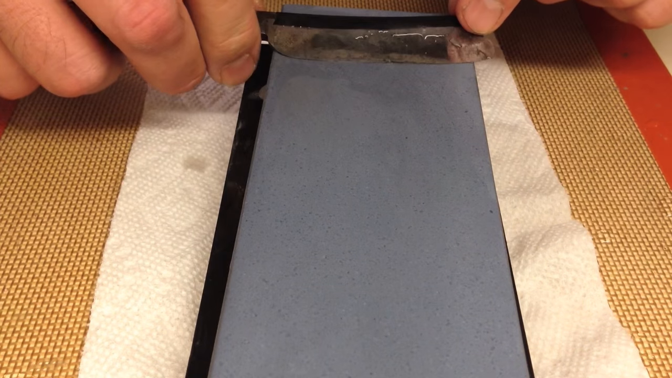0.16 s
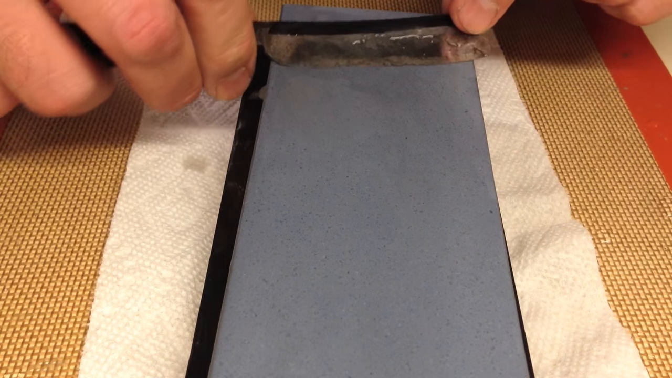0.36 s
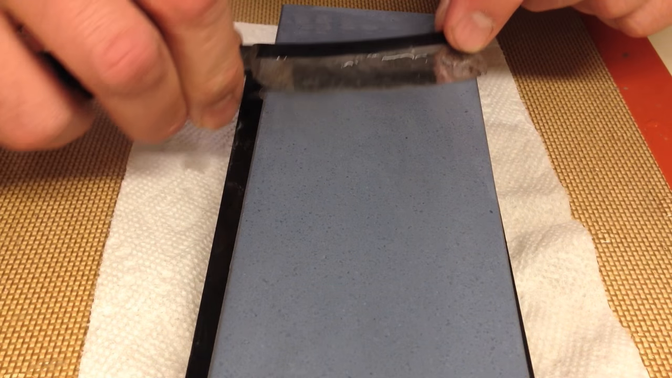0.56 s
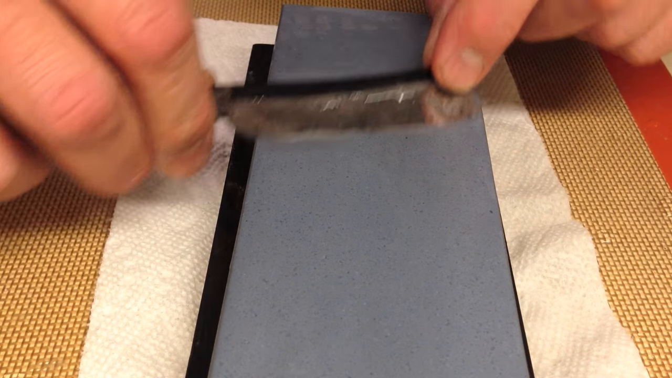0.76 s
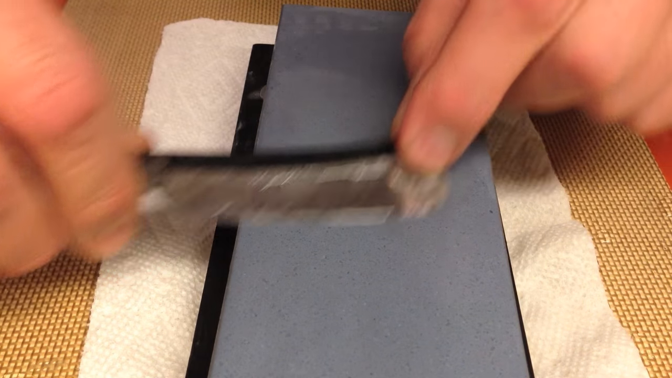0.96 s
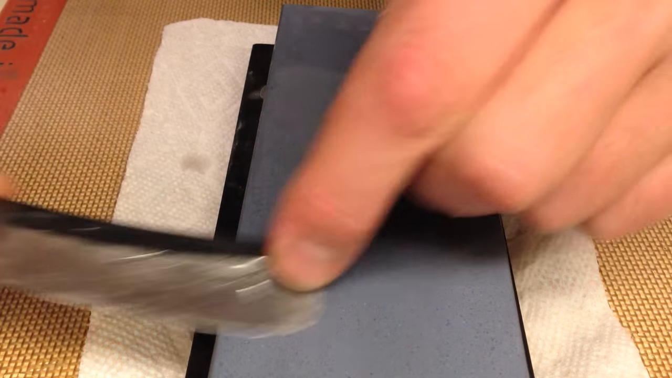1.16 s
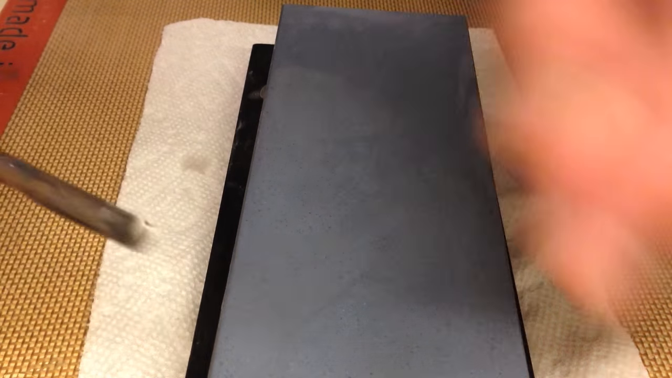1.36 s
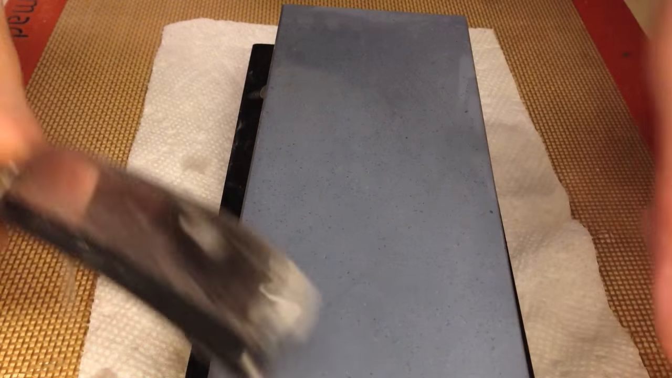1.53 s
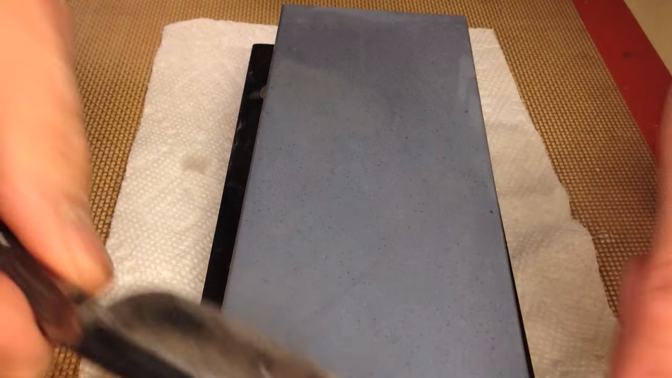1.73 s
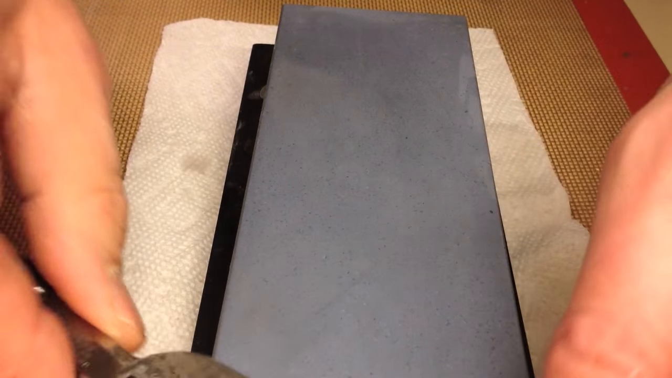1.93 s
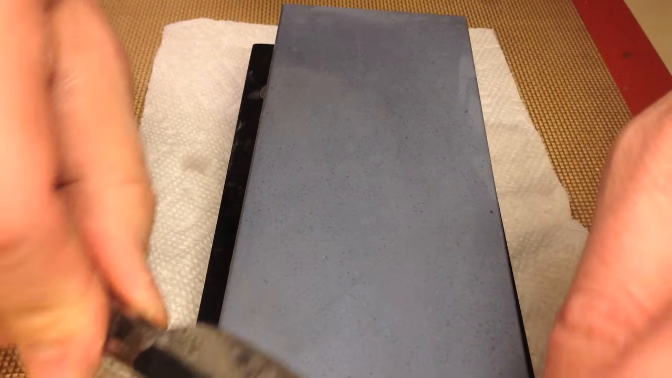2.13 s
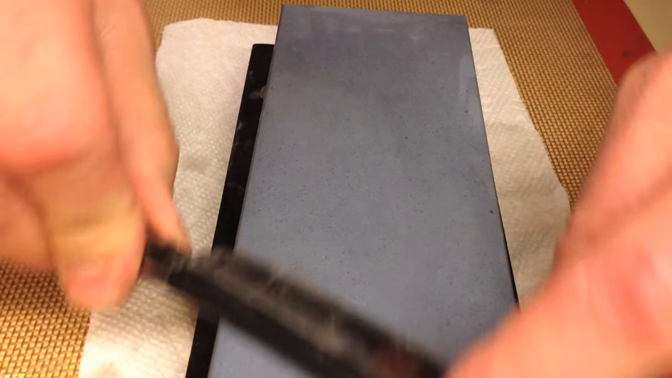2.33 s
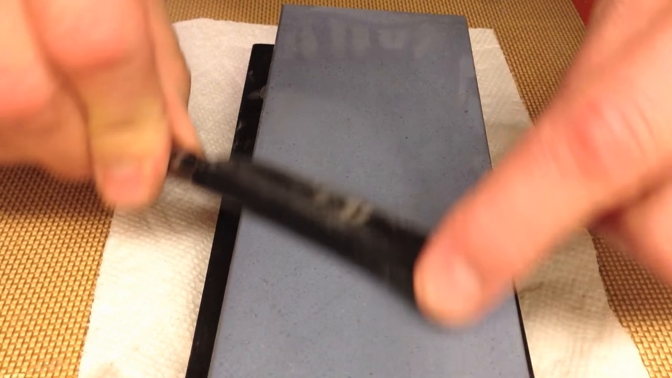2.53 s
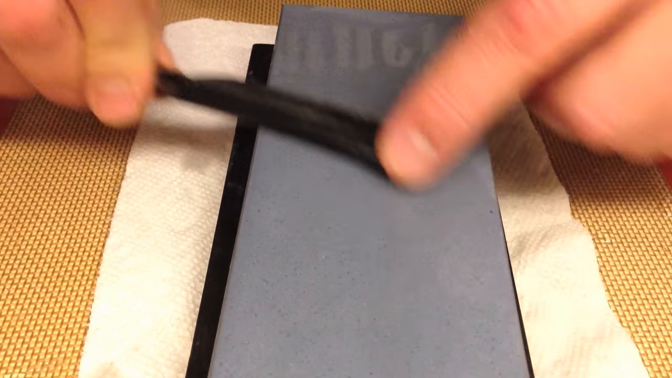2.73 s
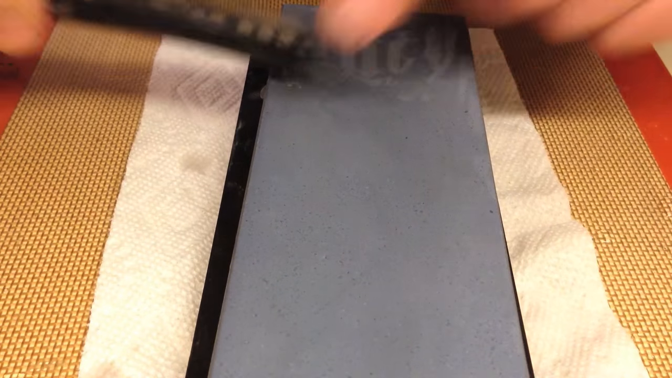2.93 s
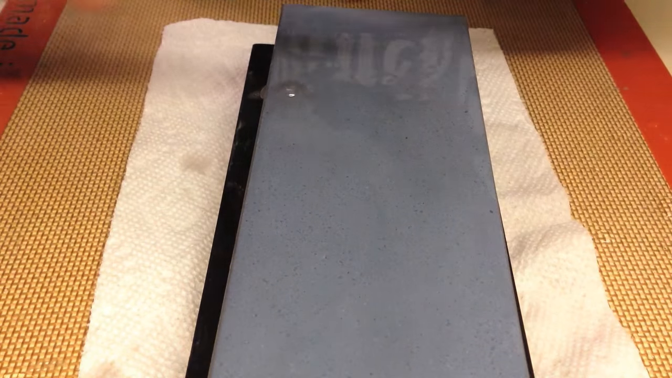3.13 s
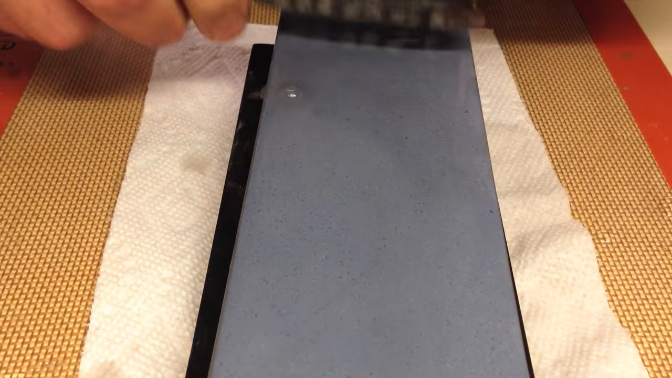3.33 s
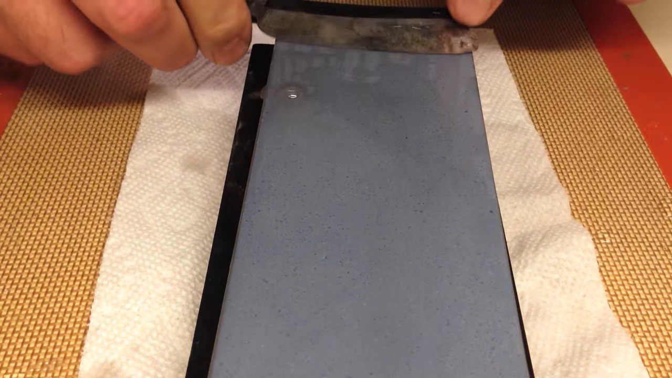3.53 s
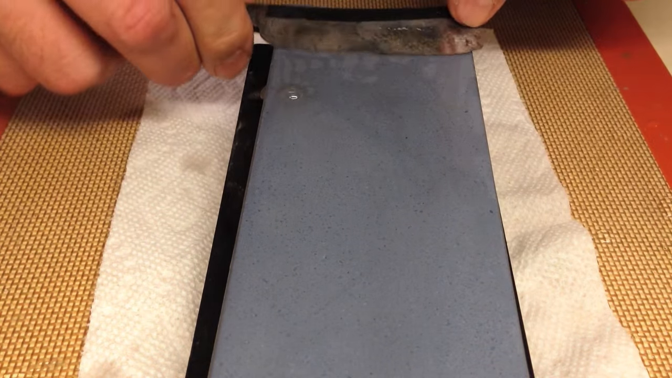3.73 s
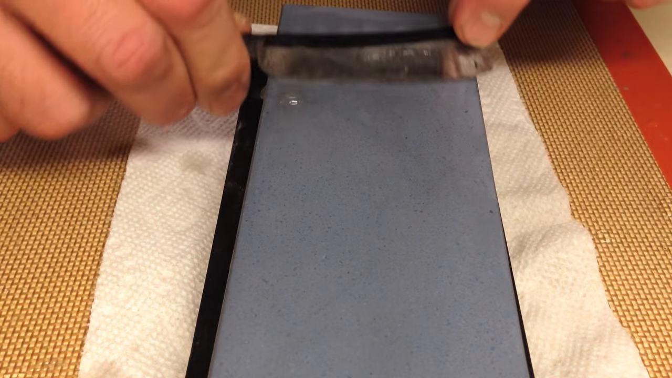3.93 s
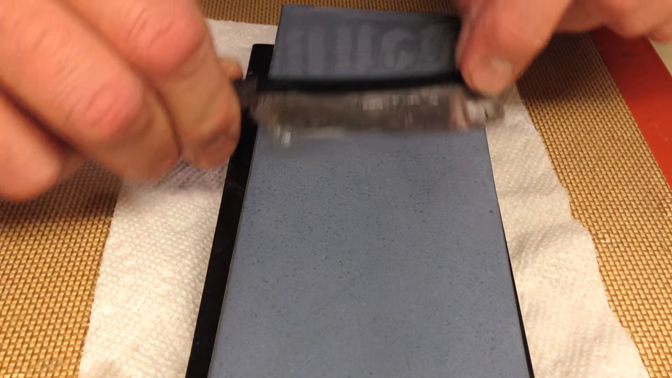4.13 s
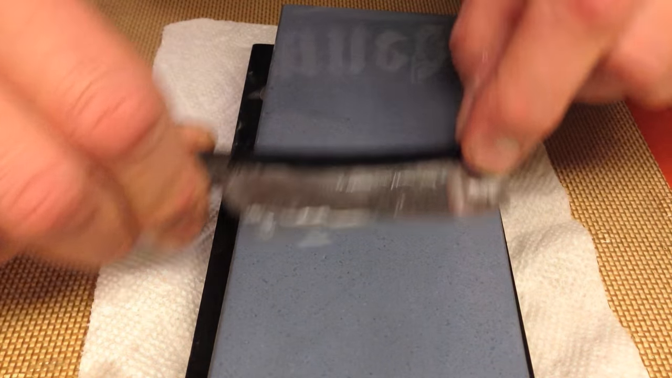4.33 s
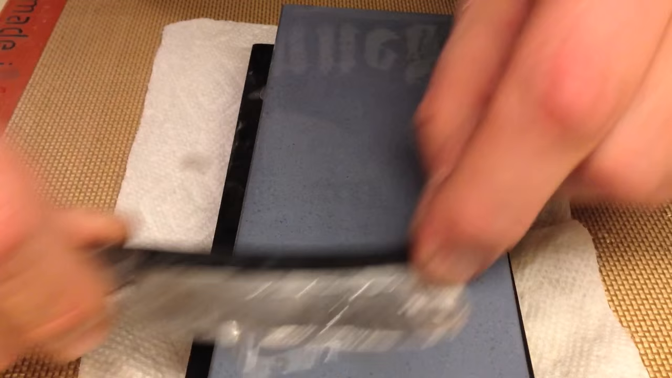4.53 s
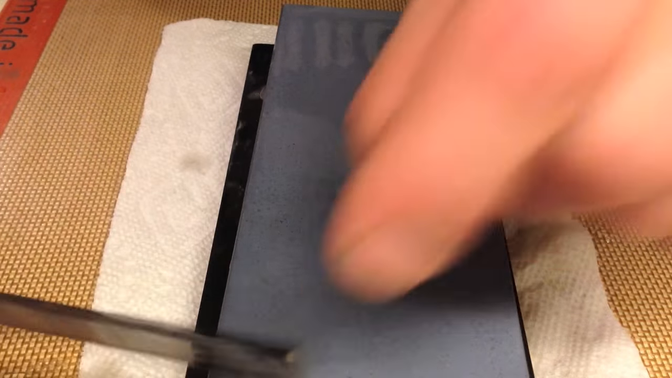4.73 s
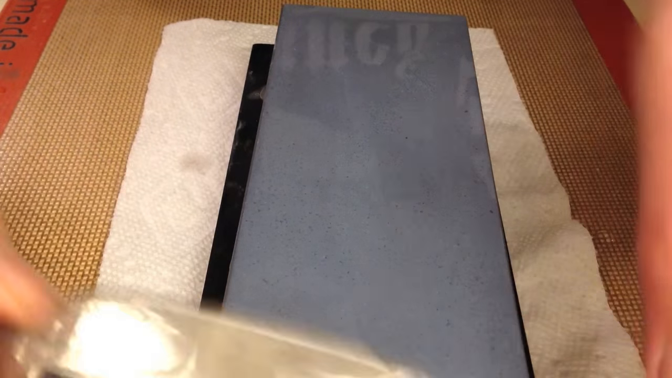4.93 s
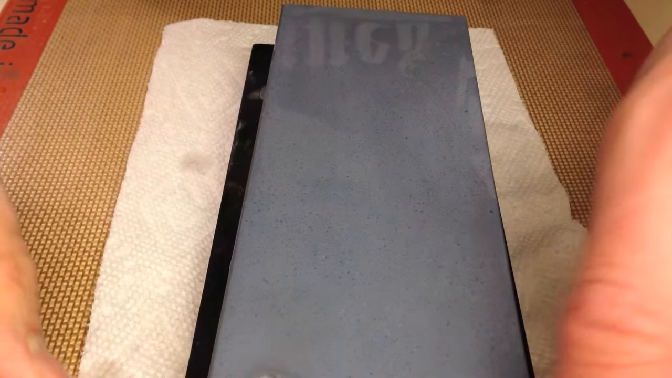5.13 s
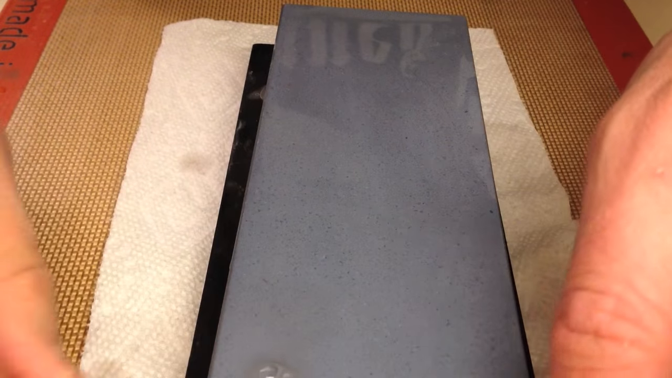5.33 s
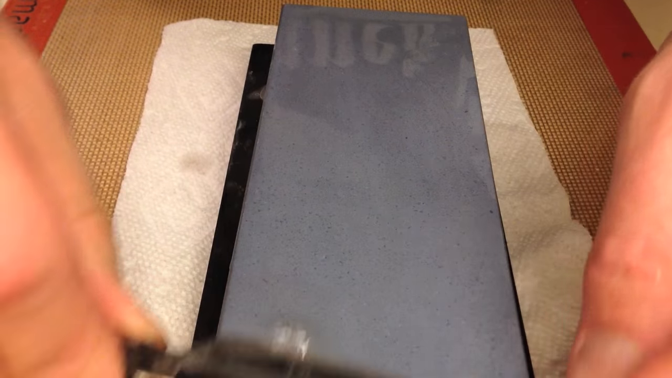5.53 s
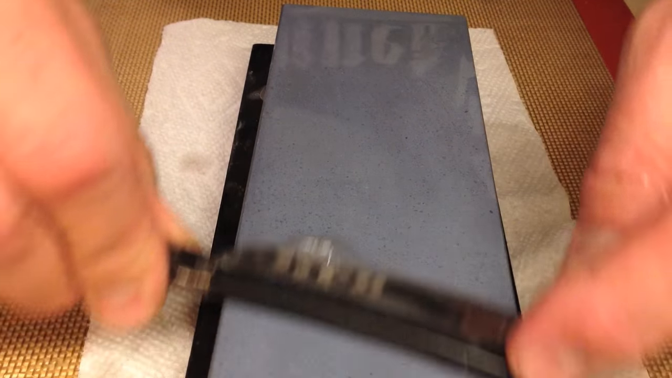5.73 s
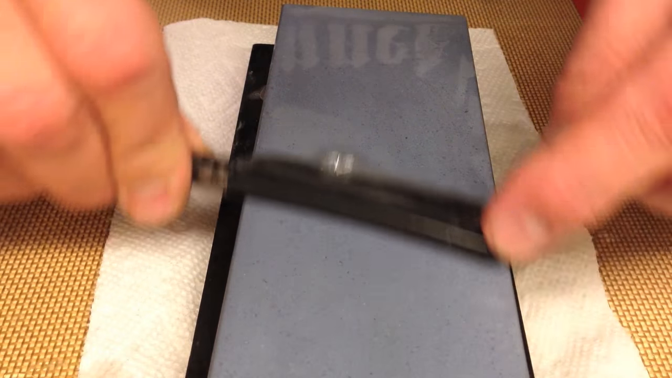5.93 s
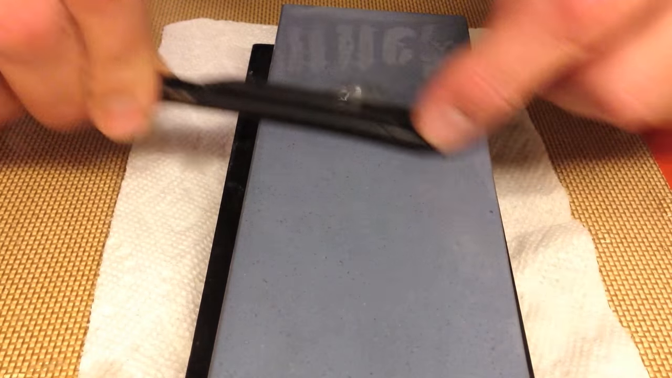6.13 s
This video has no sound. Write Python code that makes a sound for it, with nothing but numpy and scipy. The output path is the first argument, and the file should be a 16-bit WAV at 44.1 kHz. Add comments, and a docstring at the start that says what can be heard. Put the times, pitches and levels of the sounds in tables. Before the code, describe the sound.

Four gritty honing strokes of a razor on a wet stone, hard clicks at each turn, in a quiet small room with faint hum.

```python
"""A straight razor is honed on a wet waterstone on a table in a small room, over a low motor hum and room noise.
A faint touch leads to the first push; the spine clicks down and the edge rolls on to the stone for the return.
A tiny wet plink, soft contacts and the second push follow, then another click and roll and the second return.
Strokes and rubs are grit noise through resonances; touches are filtered clicks that ring blade and table."""
import sys
import numpy as np
from scipy import signal
from scipy.fft import rfft, irfft, next_fast_len
from scipy.io import wavfile
from scipy.ndimage import uniform_filter1d, map_coordinates

SR = 44100
rng = np.random.default_rng(int(sys.argv[2]) if len(sys.argv) > 2 else 0)


def wav_out(sig):
    """Save sig, one row per channel (or a flat mono array), as 16-bit PCM at SR to the path in sys.argv[1]."""
    wavfile.write(sys.argv[1], SR, np.round(np.clip(np.atleast_2d(sig).T, -1, 1) * 32767).astype(np.int16))


N = 272097

SPLIT_HZ, CUTOFF_HZ = 6800, 15500
ROOM_NOISE_DB = -48

# Plain rasp of steel on grit. Each row: frequency in Hz, relative density in dB per Hz.
RASP_SPECTRUM_HZ_DB = [(600, -29), (1200, -11), (1550, -13.5), (2200, -8), (3200, 3), (4300, 3), (6000, 4),
                       (7500, 1.5), (9500, 3), (11500, -0.5), (13800, -3), (15500, -8.5)]
# Four strokes, push and return in turn. Each row: time in seconds, level in dB before the trim of the rasp
# below the split, and of the hiss above it.
STROKE_LEVELS_S_DB = [
    [(0.36, -84, -84), (0.44, -51.5, -71.5), (0.726, -47, -50.5), (0.922, -61.5, -50.5),
     (0.946, -53.5, -45.5), (1.022, -62, -54), (1.042, -54, -56.5), (1.168, -68.5, -64),
     (1.27, -58.5, -66.5), (1.3, -91, -79)],
    [(2.1, -64, -72), (2.13, -66, -80), (2.16, -51.5, -63.5), (2.246, -47.5, -58), (2.334, -49.5, -49),
     (2.516, -59.5, -58.5), (2.58, -56, -47), (2.78, -69, -64), (2.948, -71, -71), (3.0, -79, -82)],
    [(3.7, -65, -85), (3.958, -49, -63.5), (4.234, -47.5, -61.5), (4.352, -48, -55), (4.47, -55, -66),
     (4.494, -56, -51), (4.614, -44.5, -48), (4.65, -54.5, -58), (4.718, -57, -58.5), (4.78, -73, -75)],
    [(5.395, -61, -89), (5.417, -48, -74), (5.451, -43.5, -57), (5.591, -52, -59.5), (5.675, -50.5, -63.5),
     (5.783, -58, -71), (5.841, -54, -63), (5.871, -54.5, -64.5), (6.107, -60.5, -60), (6.17, -61, -59)],
]
# Main blade resonance, one curve a stroke. Each row: time in seconds, centre in Hz.
STROKE_PITCH_S_HZ = [
    [(.45, 5860), (.72, 5370), (.82, 5830), (.91, 5550), (.945, 4400), (1.05, 3050)],
    [(2.16, 6040), (2.3, 5800), (2.5, 5600), (2.95, 5760)],
    [(4.02, 5530), (4.24, 5220), (4.32, 4700), (4.43, 4540), (4.54, 3620), (4.61, 4440), (4.66, 3230),
     (4.72, 2520)],
    [(5.41, 5970), (5.6, 5640), (5.77, 5030), (5.84, 6160), (5.97, 6700), (6.15, 6170)],
]
# Main resonance against travel. Each row: lag (travel is elapsed share to this power), width in Hz,
# lift over the plain rasp in dB, travel (0-1) where strongest, travel until 6 dB down.
STROKE_SHAPES = [(.85, 600, 21.5, 0.45, 0.32), (1, 950, 14.5, 0.14, 0.1), (1, 467, 18, 0.64, 0.3),
                 (1, 720, 12, 0.28, 0.3)]
# Lesser resonances of a push. Each row: start in Hz, end in Hz, width in Hz, lift in dB,
# travel (0-1) where strongest, travel until 6 dB down (sign has no effect).
PUSH_RESONANCES = [(1890, 1480, 320, 21.5, 0.2, 0.4), (2650, 2180, 290, 31.5, 0.21, 0.21),
                   (10200, 8000, 770, 9, 0.7, 0.3), (14000, 12700, 3400, 14, 0.21, -0.3)]
# Lesser resonances of a return. Columns as for the push: Hz, Hz, Hz, dB, travel, travel.
RETURN_RESONANCES = [(1805, 1280, 430, 23.5, .12, 0.25), (2560, 2380, 230, 13, 0.38, 0.37),
                     (9220, 5700, 1040, 10.8, 0.33, 0.1), (11200, 9400, 1900, 8.5, .58, 0.23)]
# Edge biting or brushing the wet stone. Each row: middle in seconds, half length in seconds, centre in Hz,
# width in Hz, level in dB before the swell.
RUBS = [(.18, 0.32, 2310, 196, -71.5), (0.244, 0.21, 1220, 150, -72), (0.288, 0.2, 4130, 900, -72.5),
        (0.948, 0.025, 4400, 400, -56), (1.06, 0.056, 3120, 347, -54), (1.18, 0.18, 3290, 300, -66.5),
        (1.262, 0.017, 8300, 700, -63), (1.492, 0.14, 2200, 250, -75), (1.558, 0.073, 6000, 7000, -67.5),
        (2.604, 0.1, 7240, 895, -51.5), (2.9, 0.11, 7850, 400, -70), (2.933, 0.05, 5800, 400, -69.5),
        (3.231, 0.1, 6380, 500, -80), (4.222, 0.083, 2394, 246, -49.5), (4.504, 0.022, 8450, 2000, -48),
        (4.721, .04, 2510, 199, -55), (5.668, 0.11, 2240, 454, -57), (5.838, .04, 6040, 600, -47),
        (6.123, 0.15, 3430, 550, -60.5)]
# Steel touching stone, rebounds included. Each row: time in seconds, crack in dB, ring in dB, thump in dB,
# lowest crack in Hz, top of the soft contact in Hz, sharp share of the contact in dB.
TOUCHES = [(0.12, -22, -43, -34, 706, 2790, -40), (1.9014, 10, -8.5, -10, 1800, 7020, -52),
           (2.0323, 6.5, -46, -24, 686, 3230, -18.5), (3.5287, -9.5, -35, -32, 1010, 3720, -33),
           (3.53, -16, -27.5, -23, 900, 3200, -45), (3.608, -4.5, -33, -32, 1100, 3060, -33),
           (5.152, 6, -12, -9, 1260, 6040, -51), (5.1539, 0.5, -16.5, -43.5, 1300, 2970, -50),
           (5.2948, 1, -40, -22, 600, 2150, -28), (5.327, -21.5, -50, -26, 600, 2100, -11)]
# Blade against stone. Each row: frequency in Hz, level in dB, t60 in seconds.
BLADE_MODES = [(1485, -13, .042), (3365, -2, .028), (5460, -10, .02), (6360, -2, .026), (640, -26, .03),
               (1330, -22, .02), (1740, -20, .02), (2180, -19, .015), (2470, -13, .015), (3120, -8, .012),
               (4200, -16, .015), (4480, -16, .015), (4960, -14, .015), (5970, -11, .015)]
# Stone and table under a blow, before filtering. Each row: frequency in Hz, level in dB, t60 in seconds.
TABLE_MODES = [(126.4, -24.5, .09), (186, -18, .09), (192.4, -5.5, 0.1), (237, -24.5, 0.0049),
               (454, -31.5, 0.034)]
# Small wet plinks. Each row: time in seconds, frequency in Hz, level in dB before the rise, t60 in seconds.
PLINKS = [(3.39, 1960, -45, 0.066), (3.392, 1430, -60, 0.081)]
# Nearby surfaces. Each row: delay in seconds, level in dB.
REFLECTIONS_S_DB = [(.0013, -17.5), (.004, -12.5)]
# Motor lines. Each row: frequency in Hz, mid level in dB.
HUM_HZ_DB = [(59.1, -48), (108.5, -61), (202, -63), (333, -66.5)]
# Room rumble and air. Each row: frequency in Hz, relative density in dB per Hz.
ROOM_SPECTRUM_HZ_DB = [(20, -19), (45, -15.5), (75, -6), (105, -5), (150, 0.5), (200, -0.5), (230, -9),
                       (268, 1), (305, -12.5), (360, -10), (520, -25.5), (1100, -41), (2000, -43),
                       (5000, -42), (15000, -50)]


def strokes(judder_db=1.45, judder_hz=30, trim_db=-1.35):
    """Grit drives the gliding resonances; the hand's pressure and speed set rasp and hiss."""
    t_s = np.arange(N) / SR
    sound, main_drive = grit(), grit()
    lesser_drives = [grit() for _ in PUSH_RESONANCES]
    gains = np.zeros((2, N))
    plans = zip(STROKE_LEVELS_S_DB, STROKE_PITCH_S_HZ, STROKE_SHAPES)
    for k, (levels, pitch, (lag, main_width_hz, *main_shape)) in enumerate(plans):
        start_s, end_s = levels[0][0], levels[-1][0]
        now = (t_s >= start_s) & (t_s < end_s)
        travel = ((t_s[now] - start_s) / (end_s - start_s)) ** lag
        gains[:, now] = from_db(in_time(levels, t_s[now]))
        main_hz, = in_time(pitch, t_s[now])
        sound[now] += swell(travel, *main_shape) * gliding_band(main_drive[now], main_hz, main_width_hz)
        lesser = (PUSH_RESONANCES, RETURN_RESONANCES)[k % 2]
        for drive, (from_hz, to_hz, width_hz, *shape) in zip(lesser_drives, lesser):
            centre_hz = from_hz + (to_hz - from_hz) * travel
            sound[now] += swell(travel, *shape) * gliding_band(drive[now], centre_hz, width_hz)
    # the moving contact catches and releases the lesser modes, singly and in groups
    sound = shifting_peaks(sound, depth_db=5.0, width_hz=100, hold_s=.05)
    sound = shifting_peaks(sound, depth_db=2.5, width_hz=554, hold_s=.05)
    rasp_gain, hiss_gain = uniform_filter1d(gains, size=441)  # 10 ms
    rasp = rasp_gain * evened(cut(sound, SPLIT_HZ, "low", order=8))
    hiss = hiss_gain * evened(cut(sound, SPLIT_HZ, "high", order=8))
    return (rasp + hiss) * from_db(judder_db * drift(judder_hz) + trim_db)


def grit(grains_per_s=5000, spread_db=-1.5, smooth_share=0.33):
    """Countless fine grains shear under the steel, with coarser ones among them."""
    sizes_db = spread_db * np.minimum(rng.exponential(1, N), 4)
    sizes = from_db(sizes_db) * rng.choice([-1, 1], N)
    coarse = sizes * (rng.random(N) < grains_per_s / SR)
    fine = smooth_share * rng.standard_normal(N)
    return coloured(rms_one(coarse) + fine, RASP_SPECTRUM_HZ_DB)


def swell(travel, lift_db, strongest_at, reach):
    """Gain of a resonance that is strongest while the contact passes one place on the blade."""
    return from_db(lift_db) * .5 ** (((travel - strongest_at) / reach) ** 2)


def rubs():
    """Each short rub swells and fades, its grit ringing in one resonance."""
    t_s, drive, out = np.arange(N) / SR, grit(), np.zeros(N)
    for middle_s, half_s, hz, width_hz, db in RUBS:
        now = np.abs(t_s - middle_s) < half_s
        band = rms_one(gliding_band(drive[now], np.full(now.sum(), hz), width_hz))
        out[now] += from_db(db) * np.hanning(now.sum()) * band
    return out


def touches(scatter_db=-11, scatter_t60_s=0.085, tail_db=-15, tail_follows=.25, tail_t60_s=.4,
            hard_edge_hz=6800, thump_low_hz=100):
    """Each touch cracks, rings the blade and thumps stone and table; returns crack and body."""
    cracks, blows, thumps, tails = np.zeros((4, N))
    for s, crack_db, ring_db, thump_db, low_hz, top_hz, edge_db in TOUCHES:
        click = click_at(s)
        soft = cut(click, top_hz, "low", order=12)
        sharp = cut(click, hard_edge_hz, "low", order=12)
        contact = soft + from_db(edge_db) * sharp
        crack = cut(contact, low_hz, "high", order=3)
        cracks += from_db(crack_db) * crack
        tails += from_db(tail_db + tail_follows * crack_db) * crack
        blows += from_db(ring_db) * contact
        thumps += from_db(thump_db) * click
    # hands and table scatter the crack within milliseconds
    cracks = cracks + from_db(scatter_db) * signal.fftconvolve(cracks, dying_noise(scatter_t60_s))[:N]
    # each crack leaves a faint noise tail that dies away
    cracks = cracks + signal.fftconvolve(tails, dying_noise(tail_t60_s))[:N]
    blade = sum((-1) ** k * from_db(db) * ring(blows, hz, t60_s)
                for k, (hz, db, t60_s) in enumerate(BLADE_MODES))
    table = sum(from_db(db) * ring(thumps, hz, t60_s) for hz, db, t60_s in TABLE_MODES)
    return cracks, cut(blade + cut(table, 600, "low"), thump_low_hz, "high")


def plink(rise_t60_s=0.0071):
    """A bead of water breaks with a soft, short note that swells for a few milliseconds."""
    out = np.zeros(N)
    for s, hz, db, t60_s in PLINKS:
        click = click_at(s)
        out += from_db(db) * (ring(click, hz, t60_s) - ring(click, hz, rise_t60_s))
    return out


def reflected(x):
    """Nearby surfaces add short echoes, which comb the sound."""
    t_s = np.arange(N) / SR
    return x + sum(from_db(db) * np.interp(t_s - delay_s, t_s, x, left=0) for delay_s, db in REFLECTIONS_S_DB)


def room(x, early_db=-21, early_t60_s=0.18, late_db=-28, late_t60_s=0.67, delay_s=0.0082):
    """Quick reflections off the work place, then the faint diffuse echo of the walls."""
    tail = from_db(early_db) * dying_noise(early_t60_s) + from_db(late_db) * dying_noise(late_t60_s)
    tail = np.concatenate([np.zeros(round(delay_s * SR)), tail])
    return signal.fftconvolve(x, tail)[:N]


def background(flicker_db=3.5, waver_db=0.84):
    """A motor's wavering sine lines over the uneven rumble and faint hiss of the room."""
    t_s = np.arange(N) / SR
    hum = np.zeros(N)
    for hz, db in HUM_HZ_DB:
        line = np.sqrt(2) * np.sin(2 * np.pi * (hz * t_s + rng.random()))  # rms 1
        hum += line * from_db(db + waver_db * drift(3))
    noise = from_db(ROOM_NOISE_DB) * coloured(rng.standard_normal(N), ROOM_SPECTRUM_HZ_DB)
    return hum + shifting_peaks(noise, depth_db=flicker_db, width_hz=120, hold_s=.06)


def gliding_band(x, hz, width_hz, skirt=1.68):
    """Sharp-topped resonance of gain 1 on a moving centre; its skirts fall faster farther out."""
    turn = np.exp(2j * np.pi * np.cumsum(hz) / SR)
    core = cut(x / turn, width_hz / 2, "low", order=1)  # shifted to 0 Hz, then back
    return 2 * np.real(cut(core, skirt * width_hz / 2, "low") * turn)


def shifting_peaks(x, depth_db, width_hz, hold_s):
    """Many peaks swell and fade at random, each about width_hz wide and lasting about hold_s."""
    frame = 512
    hz, s, spectrum = signal.stft(x, SR, nperseg=frame)
    grid = np.meshgrid(hz / max(width_hz, 80), s / max(hold_s, .02), indexing="ij")
    lift = map_coordinates(rng.standard_normal((300, 320)), grid, order=3, mode="wrap")
    return signal.istft(spectrum * from_db(depth_db * lift), SR, nperseg=frame)[1][:N]


def evened(x):
    """Hold the power at 1 over 40 ms, leaving the fine grain."""
    return x / np.sqrt(uniform_filter1d(x ** 2, size=1764) + 1e-12)


def ring(x, hz, t60_s):
    """A unit click sets a decaying sine of initial height 1 ringing."""
    r, w = from_db(-60 / (t60_s * SR)), 2 * np.pi * hz / SR
    return signal.lfilter([0, np.sin(w)], [1, -2 * r * np.cos(w), r * r], x + 1e-18)


def click_at(s):
    """One unit click."""
    return 1. * (np.arange(N) == round(s * SR))


def dying_noise(t60_s):
    """One second of decaying noise with unit energy."""
    t_s = np.arange(SR) / SR
    cloud = rng.standard_normal(SR) * np.exp(-np.log(1000) * t_s / t60_s)
    return cloud / np.sqrt(np.sum(cloud ** 2))


def coloured(x, spectrum):
    """Give a steady noise a spectrum; rms 1."""
    hz, db = np.transpose(spectrum)
    size = next_fast_len(N, real=True)
    bins_hz = np.maximum(np.fft.rfftfreq(size, 1 / SR), 1)
    gain = from_db(np.interp(np.log(bins_hz), np.log(hz), db))
    return rms_one(irfft(rfft(x, size) * gain, size)[:N])


def drift(rate_hz):
    """Smooth chance of rms 1, changing about rate_hz times a second."""
    return rms_one(cut(rng.standard_normal(N + SR), rate_hz, "low")[SR:])


def cut(x, hz, kind, order=2):
    """Causal low- or high-pass."""
    sos = signal.butter(order, min(hz, .45 * SR), kind, fs=SR, output="sos")
    return signal.sosfilt(sos, x + 1e-18)


def in_time(rows, t_s):
    """Columns of a curve table at the times t_s."""
    s, *columns = np.transpose(rows)
    return [np.interp(t_s, s, c) for c in columns]


def rms_one(x):
    """Scale to unit power."""
    return x / np.sqrt(np.mean(x ** 2) + 1e-20)


def from_db(db):
    """Decibels to gain."""
    return 10 ** (np.asarray(db) / 20)


def scene(body_in_room_db=-6):
    """Razor and stone close by, the room behind; blade and table ring mostly in the near field."""
    cracks, body = touches()
    sharp = strokes() + rubs() + cracks + plink()
    near = reflected(sharp + body)
    far = room(sharp + from_db(body_in_room_db) * body)
    return (near + far + background())[None]


def record(dry):
    """Peaks stop at full scale, then the top is cut."""
    low_pass = signal.ellip(12, .1, 70, CUTOFF_HZ, fs=SR, output="sos")
    return signal.sosfilt(low_pass, np.clip(dry, -1, 1))


dry = scene()
out = record(dry)
wav_out(out)
```